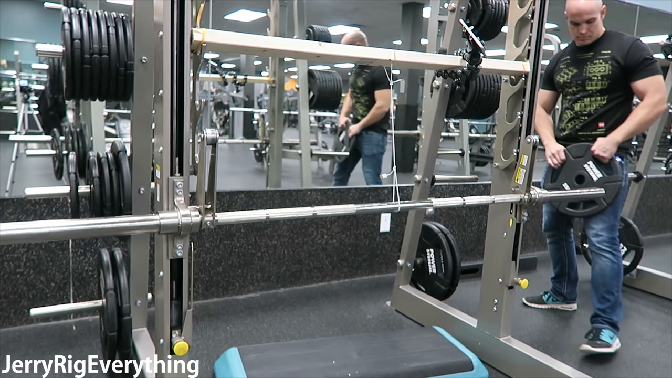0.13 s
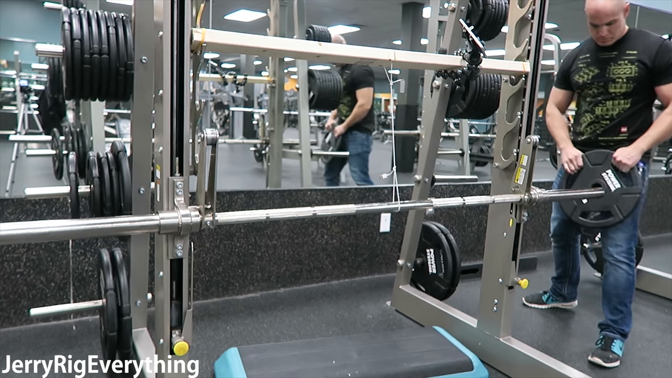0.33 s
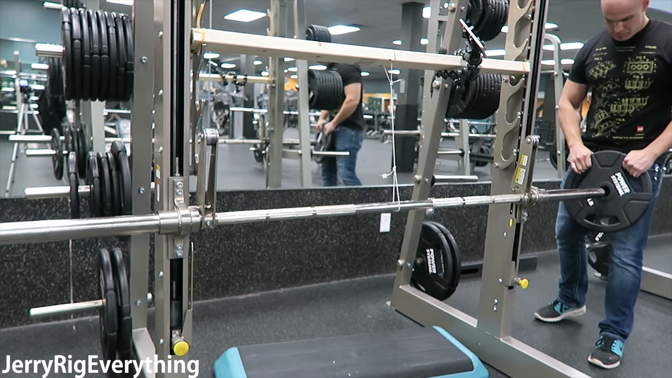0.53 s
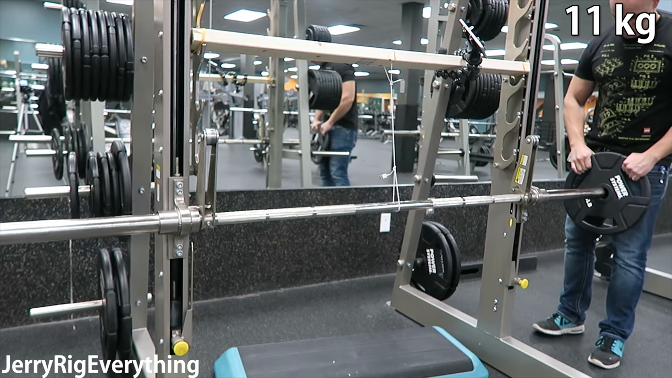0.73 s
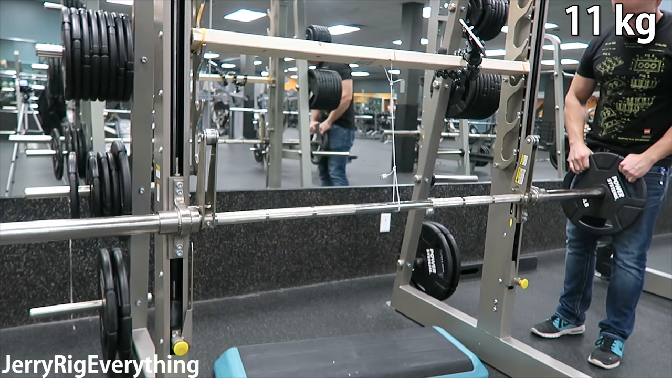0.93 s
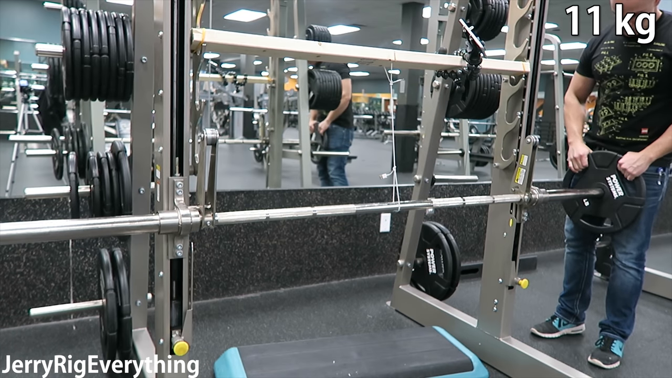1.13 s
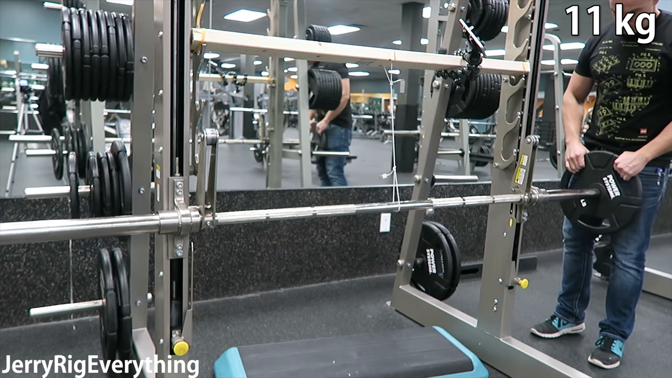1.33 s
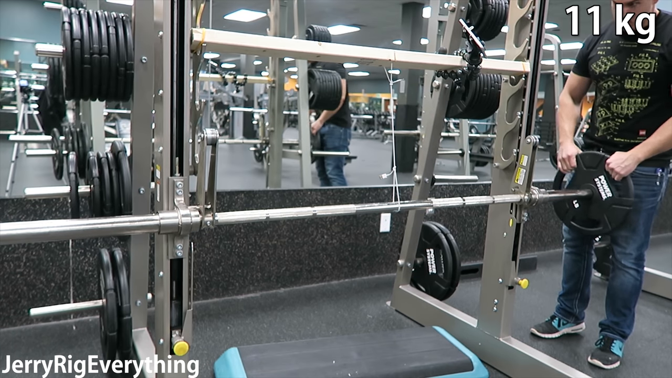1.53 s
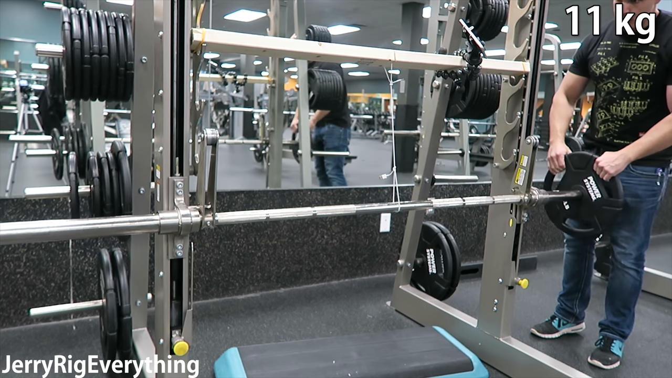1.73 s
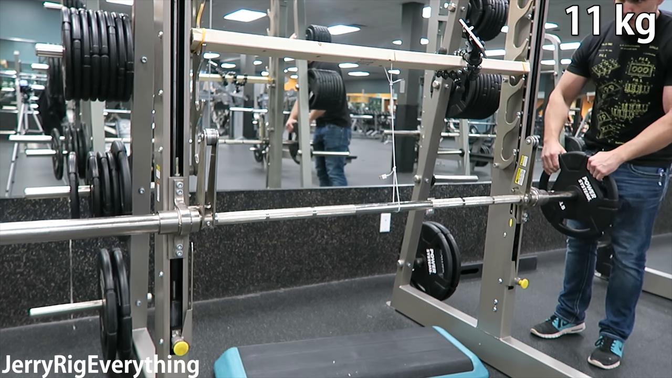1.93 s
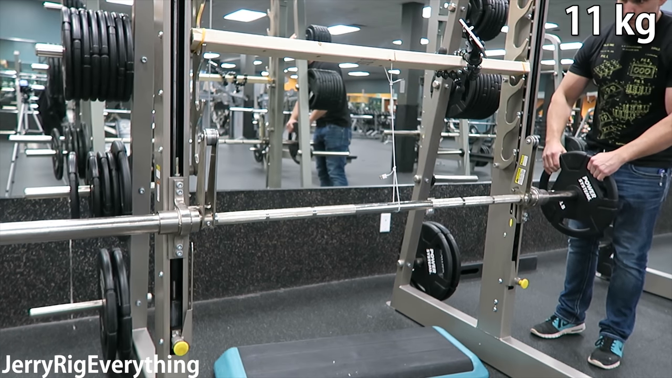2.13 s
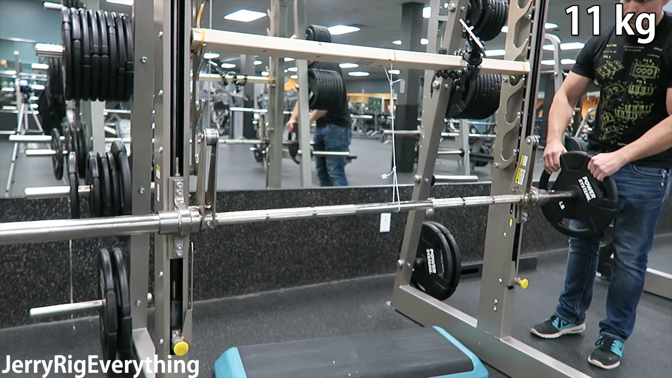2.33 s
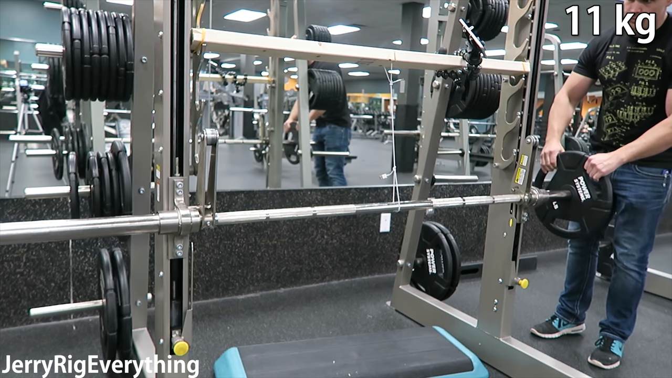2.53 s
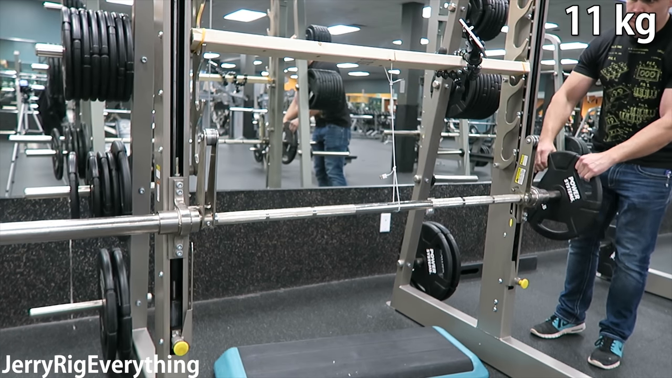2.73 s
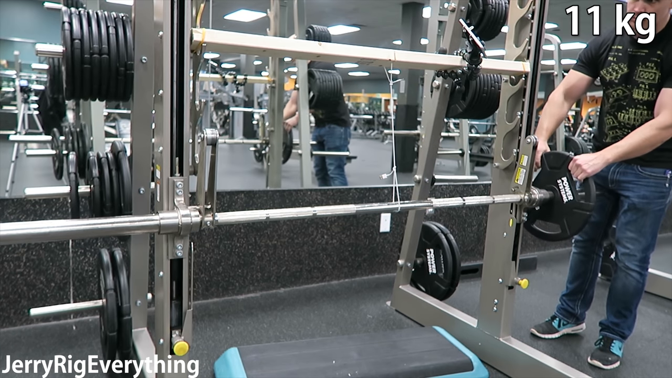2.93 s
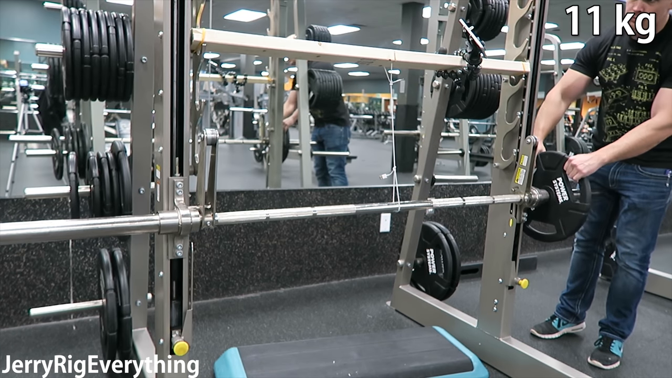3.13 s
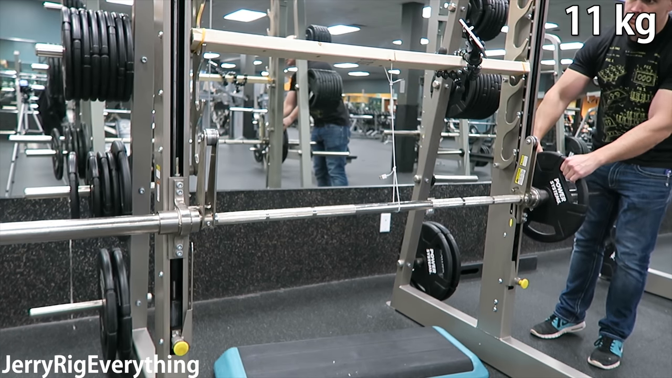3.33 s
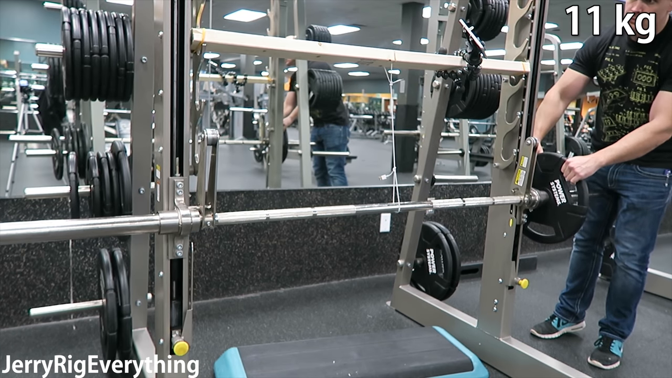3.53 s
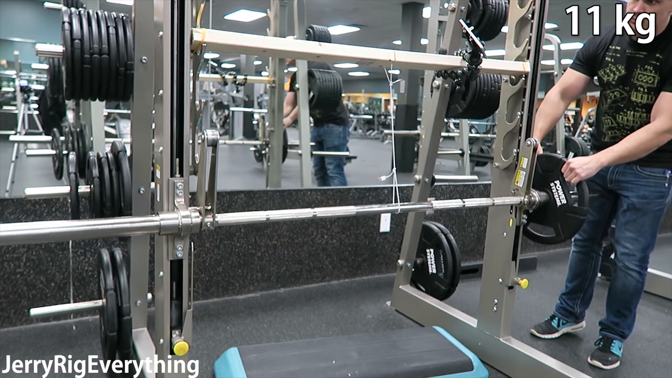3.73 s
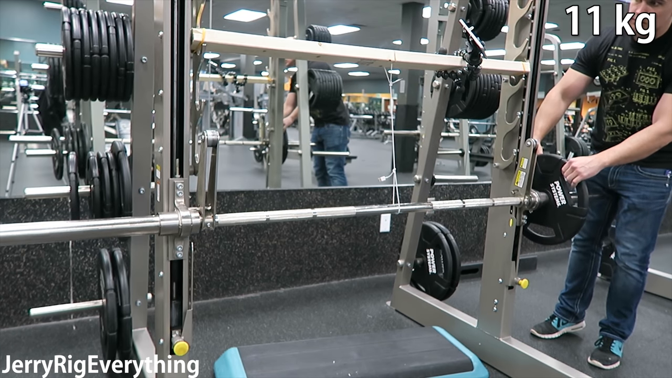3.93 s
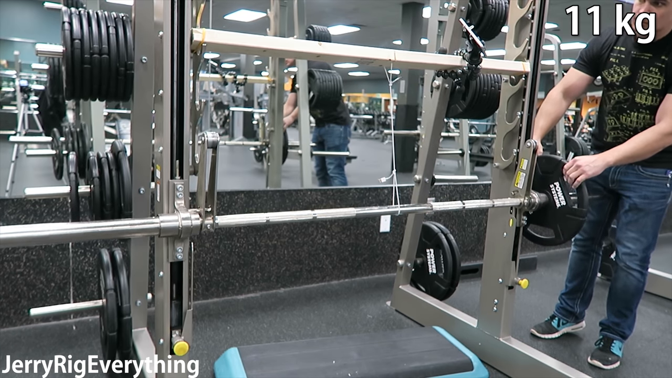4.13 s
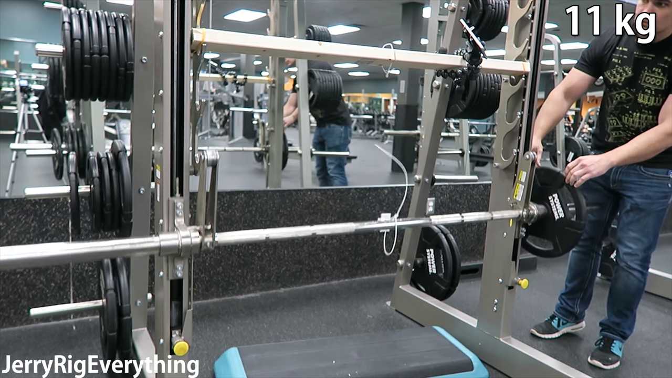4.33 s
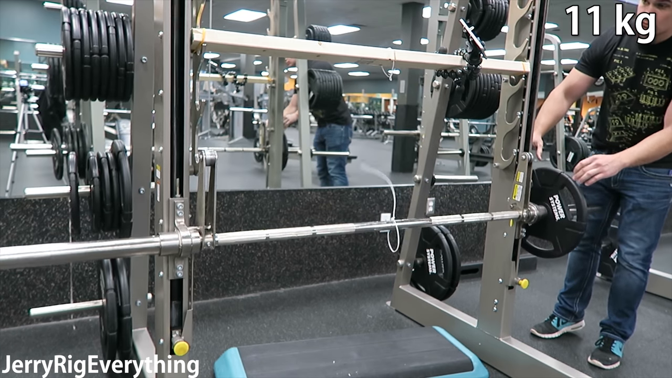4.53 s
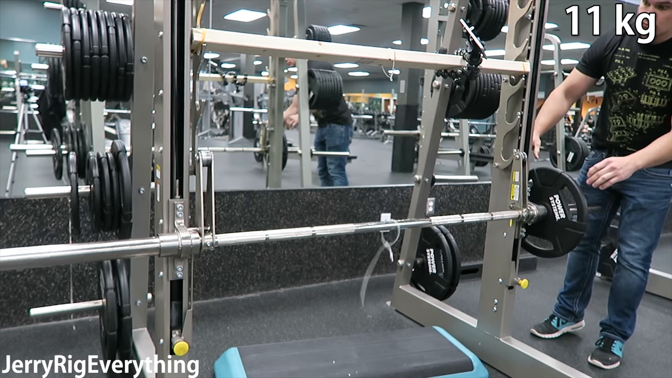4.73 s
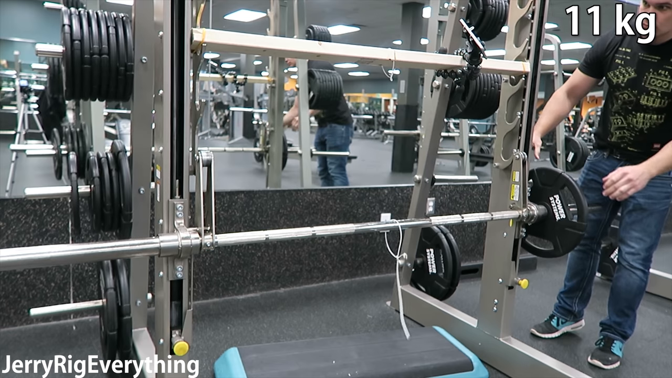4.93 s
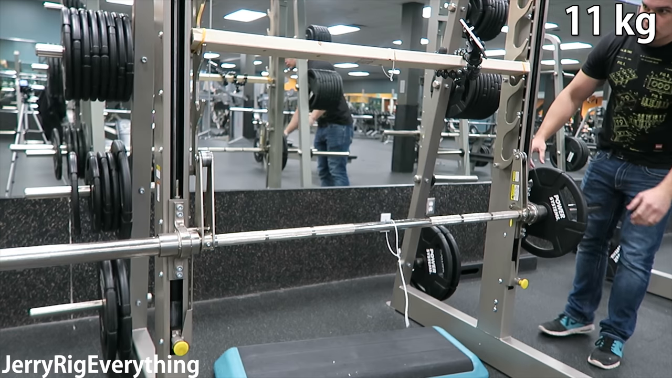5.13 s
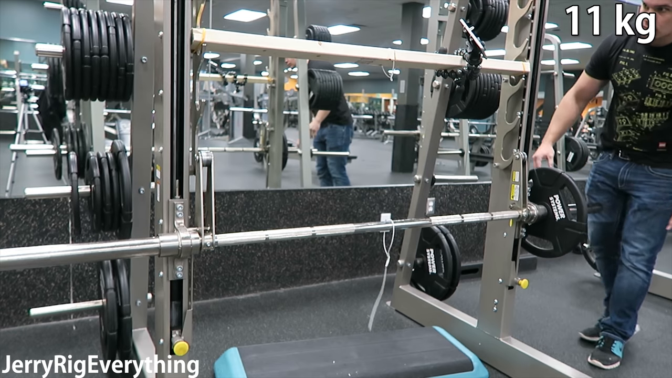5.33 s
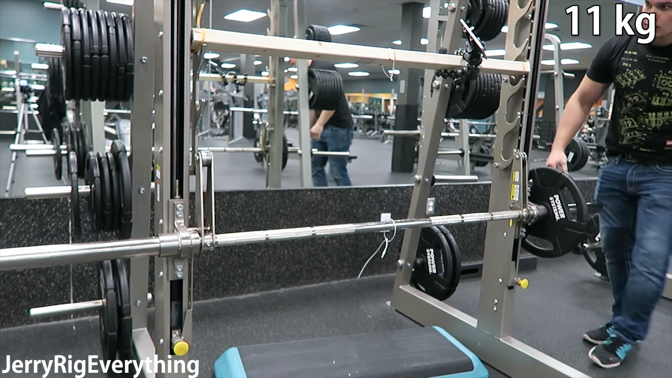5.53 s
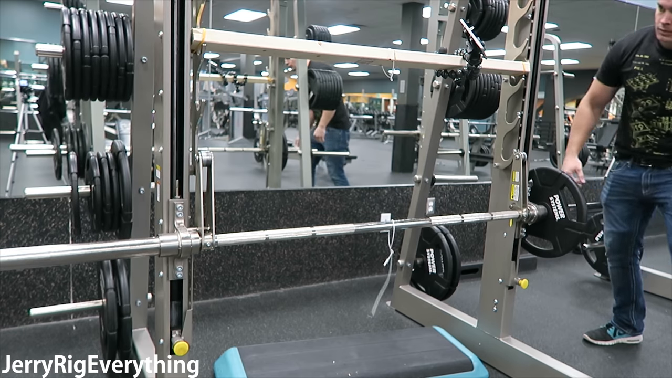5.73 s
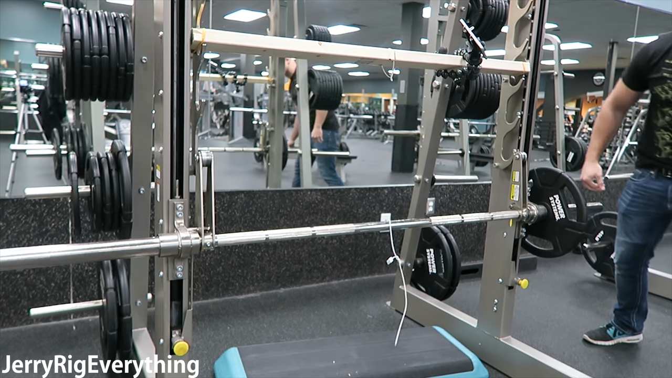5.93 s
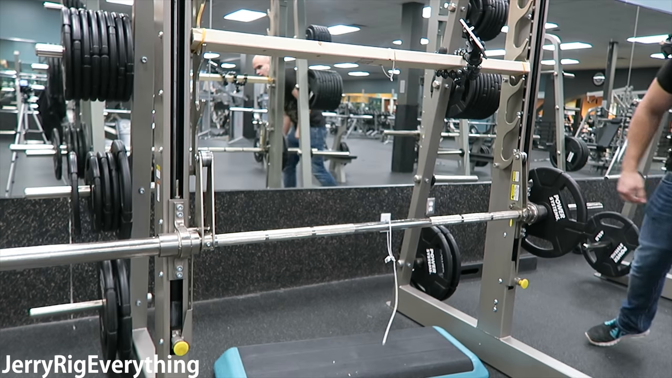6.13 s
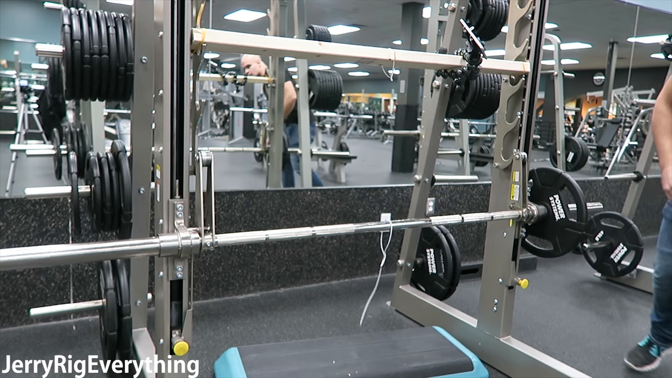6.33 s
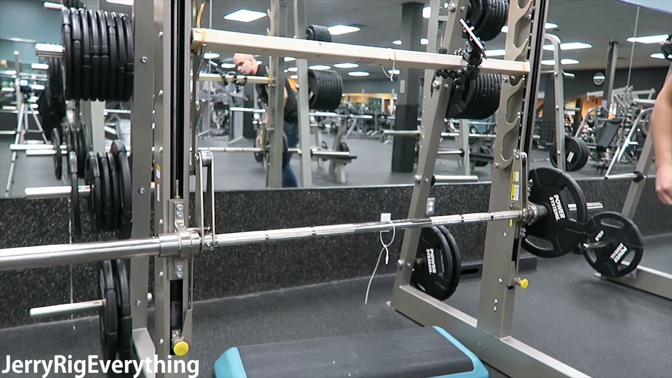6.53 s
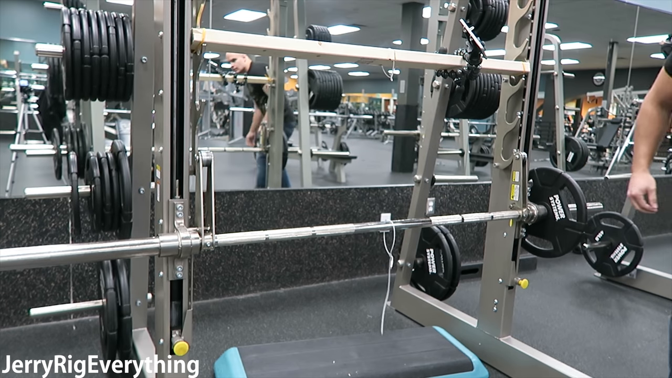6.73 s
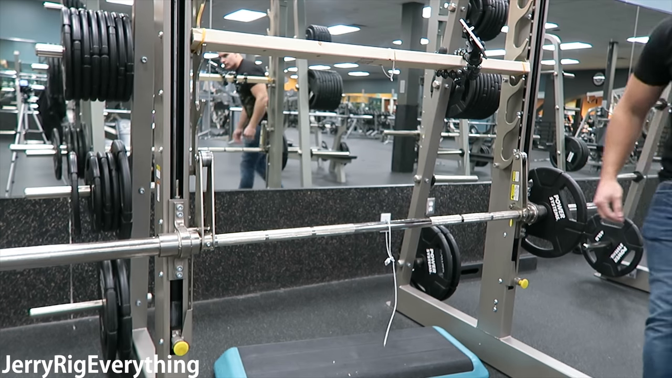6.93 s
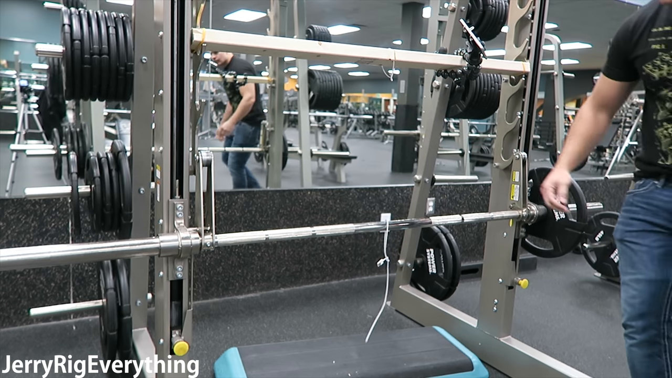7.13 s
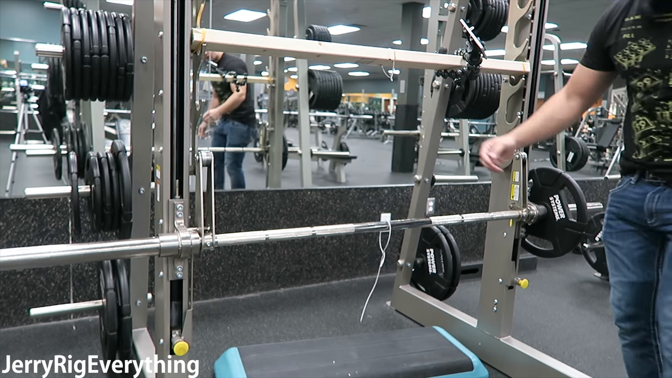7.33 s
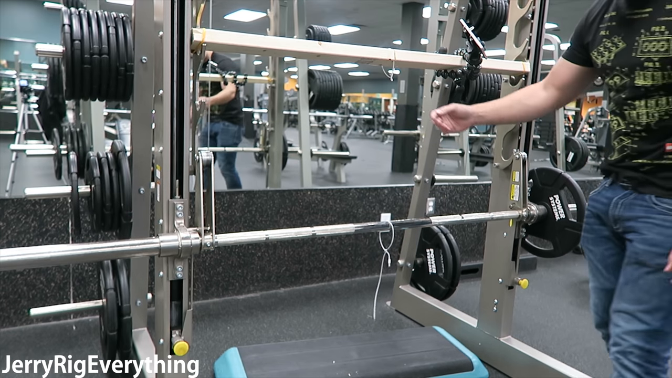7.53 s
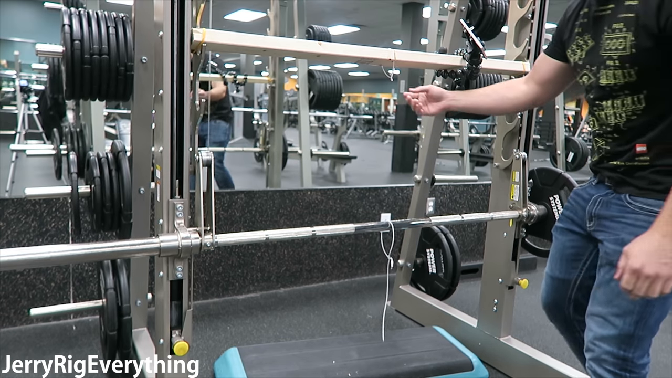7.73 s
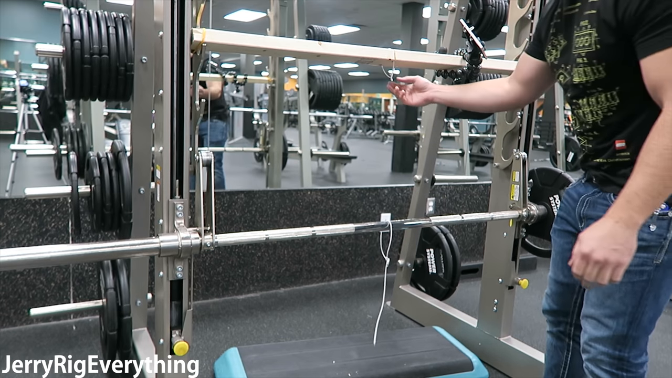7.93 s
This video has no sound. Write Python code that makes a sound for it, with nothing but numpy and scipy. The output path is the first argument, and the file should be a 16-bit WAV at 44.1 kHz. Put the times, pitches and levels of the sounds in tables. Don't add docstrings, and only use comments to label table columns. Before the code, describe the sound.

A microphone a few metres off catches a wide fan rumble and airy hiss in a big hall. Soft iron bumps and a few glancing clinks come first; midway, a fast cluster of loud, bright steel clanks with chattering grind and short squeals ends in a final clank. The background briefly drops, a thin bar tone lingers, then only faint rustles and distant taps remain.

```python
import sys
import numpy as np
from scipy import signal
from scipy.fft import rfft, irfft, next_fast_len
from scipy.io import wavfile
from scipy.ndimage import map_coordinates

SR = 44100
rng = np.random.default_rng(int(sys.argv[2]) if len(sys.argv) > 2 else 0)


def store_pcm(level_fs):
    pcm = np.round(np.clip(level_fs, -1, 1) * 32767).astype(np.int16)
    wavfile.write(sys.argv[1], SR, np.atleast_2d(pcm).T)


def ratio(d):
    e = np.asarray(d, float) / 20
    return 10 ** e


N = 355798

# (frequency [Hz], density [dB per Hz])
RUMBLE_SPECTRUM = [(13, -32), (22, -10), (38, -5.5), (54, -1), (70, 1), (101, -12), (118, -4.5), (131, 1),
                   (162, -7), (196, -2), (230, -8), (312, -10), (368, -13.5), (412, -25), (450, -18),
                   (580, -41), (990, -120)]
# (frequency [Hz], density [dB per Hz])
HISS_SPECTRUM = [(220, -29), (380, -3), (543, -7), (718, -5.5), (852, -9), (950, -7.5), (1010, -7.5),
                 (1380, -11), (2380, -15.5), (2770, -18), (3290, -18.5), (5850, -31.5), (11800, -43),
                 (14000, -51.5), (15600, -78)]
# (frequency [Hz], left-right likeness [-1 to 1])
AIR_ALIKE = [(60, .9995), (130, .99), (290, .86), (640, .6), (1410, .79), (3100, .72), (6820, -.07),
             (15000, -.5)]
# (time [s], depth [dB], attack [s], hold [s], release [s])
GAIN_DUCK = (4.5, -10, 0.22, 0.64, 1.18)

# (frequency [Hz], width [Hz], level [dB])
PLATE_MODES = [(205, 20, -7), (319.7, 7.7, -2), (502, 43.4, -1), (545, 24, 2), (571, 29, 2.5),
               (701, 47, -0.5), (789, 45, -4.5), (930, 26, 2.5), (976, 29, -2.5), (1050, 18, 5),
               (1180, 140, -5.5), (1267, 51, 2), (890, 1500, -7)]
RACK_MODES = [(1400, 94, 20.5), (1706, 26, 12), (1900, 840, -5.5), (2020, 59, 7), (2210, 83, -10),
              (2460, 75, -3), (2956, 100, -4), (3570, 67, -10), (1900, 2700, -2)]
TREBLE_MODES = [(3640, 140, 4), (4100, 750, 9), (4550, 970, 3.5), (6200, 140, -4), (7300, 200, -28),
                (8900, 330, -11.5), (10400, 4300, -10.5), (12670, 830, -18.5), (5000, 5900, -7)]
SLEEVE_MODES = [(2780, 59, -7.5), (2740, 69, -5.5), (2870, 37, -1), (2880, 30, -10.5), (3580, 29, 2),
                (3640, 45, -2), (4560, 81, 3.5), (4760, 63, -8), (5270, 70, -17), (5500, 35, -6),
                (6440, 22, -8), (7300, 25, -4), (8300, 34, -3), (10200, 60, -3)]
# (from [Hz], to [Hz])
BODY_REACH = [(160, 1450), (1350, 3600), (3300, 12000), (2000, 11000)]

# (time [s], rack peak [dB], centre [Hz], length [s])
SCUFFS_AT = [(0.127, -37.5, 1340, 0.043), (0.515, -39, 1520, 0.03), (0.85, -33.5, 2000, 0.063),
             (1.751, -37.5, 1410, 0.052), (2.012, -34.5, 1400, 0.055), (2.083, -37.5, 2820, 0.047),
             (3.481, -32, 3000, 0.015), (3.894, -42, 3000, 0.016), (5.498, -51, 2190, 0.026),
             (5.665, -42.5, 2020, 0.059), (7.415, -31, 2400, 0.042), (7.595, -39, 3000, 0.039),
             (7.813, -34.5, 1500, 0.038), (8.025, -30.5, 2400, 0.12)]
# (time [s], peak [dB], centre [Hz], length [s])
SWISHES_AT = [(.85, -53, 4800, 0.038), (3.36, -35.5, 7000, 0.046), (3.42, -49, 5500, 0.046),
              (3.485, -48, 4500, 0.028), (4.05, -38, 6200, 0.023), (4.25, -34, 4100, 0.017),
              (4.97, -46, 4760, 0.057), (5.49, -61, 5000, 0.027), (5.65, -68, 5430, 0.046),
              (7.575, -53, 4750, 0.045), (7.82, -56, 5000, 0.052)]
# (time [s], plate peak [dB], centre [Hz], contact length [s])
NUDGES_AT = [(1.104, -28.5, 487, 0.085), (1.173, -28.5, 314, 0.063), (1.264, -19, 660, 0.039),
             (1.335, -38, 304, 0.027), (1.539, -14, 830, 0.031), (1.553, -11.5, 1050, 0.013),
             (1.56, -14.5, 980, 0.022), (1.582, -17.5, 500, 0.055), (1.66, -33, 700, 0.2),
             (2.037, -26.5, 640, 0.026), (2.182, -24.5, 620, 0.046), (2.362, -28.5, 324, 0.053),
             (2.656, -29, 340, 0.13), (2.799, -30, 490, 0.014), (2.82, -20, 450, 0.058),
             (2.863, -28, 543, 0.11), (2.915, -38, 571, 0.054), (2.948, -20, 440, 0.039),
             (3.073, -34.5, 462, 0.017), (3.626, -44, 307, .03)]
# (time [s], plate peak [dB], centre [Hz], contact length [s])
KNOCKS_AT = [(3.372, -15, 433, 0.011), (3.461, -28, 310, 0.028), (4.386, -9.5, 557, 0.017),
             (4.475, -5, 530, 0.021), (4.495, -18, 515, 0.041), (4.595, -7.5, 706, 0.014),
             (4.639, -23, 674, 0.0076), (4.853, -7, 540, 0.028), (4.969, -15.5, 706, .035),
             (5.48, -39, 596, 0.027), (5.994, -37.5, 377, 0.026), (6.11, -37, 350, 0.03)]
# (time [s], peak [dB], centre [Hz], contact length [s])
THUDS_AT = [(1.29, -23.5, 250, 0.08), (1.555, -19.5, 235, 0.049), (2.808, -31, 1130, 0.062),
            (2.85, -28.5, 1180, 0.036), (3.37, -18.5, 235, 0.094), (3.385, -23.5, 990, 0.068),
            (4.04, -31, 513, 0.023), (4.235, -19.5, 591, 0.055), (4.49, -19.5, 1000, 0.028),
            (4.535, -13, 943, 0.045), (4.58, -29.5, 215, 0.044), (4.62, -17.5, 1120, 0.027),
            (8.03, -31, 205, 0.025)]
# (time [s], rack peak [dB], centre [Hz], plate under rack [dB], contact length [s])
GLANCES_AT = [
    (1.273, -22.5, 2860, 4.5, 0.034),
    (1.536, -14, 2370, -9, 0.025),
    (1.547, -14, 1980, -12, 0.022),
    (3.353, -18, 2900, 7, 0.02),
    (3.374, -23.5, 1550, 2, 0.034),
]
# (time [s], rack peak [dB], centre [Hz], treble [dB], contact length [s])
CLACKS_AT = [(4.031, -18, 2080, -6.5, .0097), (4.038, -20, 2090, -9, .012), (4.22, -4, 2310, -27, .0037),
             (4.227, -11, 1510, -6.5, .016), (4.325, -19.5, 2210, -16, .0063),
             (4.332, -21, 2600, -6.5, .01), (4.351, -16, 2230, -5.5, .036), (4.371, -10, 1900, -25.5, .012),
             (4.38, -17.5, 2310, -15, .0051), (4.47, -15, 2370, -15.5, .0064),
             (4.509, -26, 1400, -17, .014), (4.579, -2.5, 2800, -21, .011),
             (4.583, -1.5, 1740, -11.5, .011), (4.602, -22.5, 1865, -15.5, .019),
             (4.707, -20.5, 3000, -7, .02), (4.774, -22, 2150, -22, .012), (4.823, -14.5, 3000, -8.5, .03),
             (4.852, -8.5, 2780, -9.5, 0.017), (4.861, -17.5, 2306, -6, .011),
             (4.892, -18.5, 2270, -17, .02)]
# (time [s], plate over rack [dB])
SEATED_LEVEL = [
    (4.04, -31),
    (4.22, -11.5),
    (4.38, -1),
    (4.6, -5.5),
    (4.75, 4.5),
    (4.82, -20),
    (4.86, -1),
]
# (time [s], peak [dB], centre [Hz], contact length [s])
CHIMES_AT = [(1.284, -39, 2900, 0.033), (1.286, -56, 4560, 0.012), (1.338, -47, 2940, 0.054),
             (1.56, -46, 2900, 0.024), (1.56, -56, 8300, 0.016), (1.795, -51, 2880, 0.029),
             (2.08, -48.5, 2900, 0.02), (3.358, -28.5, 2880, 0.017), (3.36, -35, 3700, 0.016),
             (3.358, -46, 4600, 0.014), (4.51, -32, 3700, 0.033), (4.545, -34.5, 4550, 0.033),
             (4.555, -39, 5540, 0.026), (4.65, -36.5, 4550, .02), (4.68, -33, 3660, 0.073),
             (4.745, -31, 2870, 0.12), (4.76, -52, 7300, 0.045), (4.851, -16.5, 2760, 0.023),
             (4.92, -38, 2750, 0.1), (5.02, -50, 2870, 0.042)]
# (time [s], frequency [Hz], level [dB], t60 [s])
TONES_AT = [(1.284, 2930, -36, 0.2), (1.287, 4560, -40.5, 0.13), (1.287, 6370, -47, 0.11),
            (1.287, 8200, -51, 0.12), (1.341, 2900, -47, 0.19), (1.54, 2420, -25, 0.079),
            (1.539, 2740, -27, .1), (1.543, 3130, -31.5, .15), (1.546, 1894, -27, 0.14),
            (1.56, 973, -19, 0.12), (1.575, 523.4, -33.5, 0.51), (1.6, 987, -36, 0.76),
            (1.56, 8700, -54, 0.14), (2.036, 658, -50, 0.11), (4.032, 1737, -22, 0.063),
            (4.033, 2225, -18.5, 0.06), (4.035, 3880, -26.5, 0.07), (4.04, 6210, -33, 0.099),
            (4.226, 1530, -27, .15), (4.49, 530, -22, 0.22), (4.852, 2778, -14, 0.078),
            (4.853, 546, -28, 0.12), (4.878, 2224, -26.5, .2), (4.899, 2762, -31, 0.2),
            (4.972, 2790, -32.5, 0.13), (4.99, 602, -30.5, 0.18), (4.9, 447, -33.5, 0.28),
            (5.0, 956, -37, 0.61), (7.415, 2700, -49, 0.13), (7.414, 1260, -42, 0.12),
            (7.428, 1900, -55, 0.092), (5.0, 2600, -50.5, 0.75), (4.855, 5800, -38, .3),
            (4.975, 5300, -47, .25), (2.81, 980, -36, 0.23), (2.82, 1190, -37.5, 0.16),
            (4.78, 1200, -27.5, .1), (1.551, 1270, -25, 0.086), (1.596, 1260, -36, .2),
            (4.584, 1200, -15.5, .05), (4.64, 1300, -30, .1), (3.375, 500, -30, .12),
            (3.41, 1000, -36, 0.17)]
# (time [s], frequency [Hz], level [dB], hold [s])
SQUEALS_AT = [(4.478, 4820, -41, 0.0075), (4.507, 4330, -32, 0.0094), (4.53, 3580, -30, 0.044),
              (4.537, 7300, -39, 0.057), (4.527, 9400, -26, .005), (4.555, 10700, -39, .025),
              (4.67, 11150, -40, .012), (4.722, 7200, -45, 0.031), (4.543, 4550, -26.5, 0.024),
              (4.553, 5240, -40, 0.017), (4.59, 5390, -32, .012), (4.65, 4550, -38, 0.018),
              (4.68, 3654, -36.5, 0.036), (4.706, 4500, -33, 0.025), (4.745, 2870, -34.5, 0.094),
              (4.761, 7100, -44, 0.02), (4.78, 2130, -27.5, 0.01), (4.784, 4550, -37, 0.011),
              (4.82, 4130, -26, 0.0069), (4.83, 3530, -29, 0.0074), (4.478, 545, -24.5, .012),
              (4.497, 525, -20, 0.016), (4.554, 602, -24, .015), (4.585, 660, -16, 0.0039),
              (4.598, 678, -13.5, .005), (4.615, 600, -21, .005)]
# (time [s], rack peak [dB], centre [Hz], plate over rack [dB], length [s])
RUBS_AT = [
    (2.38, -34, 1400, 6, .025),
    (2.19, -41, 1450, -3, .03),
    (2.4, -41, 1400, 5, 0.12),
    (3.365, -27, 1400, 5, .05),
    (3.9, -35, 1700, -1, .04),
    (1.6, -32, 1500, -5, 0.034),
]
# (time [s], level [dB], frequency [Hz], t60 [s])
LOW_SWAY = (2.5, -45, 27, 1)
# (time [s], peak [dB], frequency [Hz])
SNAPS_AT = [(4.0315, -22, 2200), (4.2199, 0, 2140), (4.2245, -7, 1920), (4.325, -22, 2200),
            (4.3505, -16, 2220), (4.3709, -4.5, 2210), (4.3755, -8, 2300), (4.4722, -14, 2370),
            (4.779, -23, 2130), (4.8224, -17, 3320), (4.851, -7, 2780), (4.9714, -26, 2740)]
# (time [s], peak [dB], centre [Hz], contact length [s])
TICKS_AT = [(4.04, -24.5, 8900, 0.0021), (4.047, -36, 8900, .003), (4.058, -37, 6980, .003),
            (4.066, -37, 7030, .004), (4.228, -29.5, 8900, 0.0024), (4.236, -37, 8900, 0.0035),
            (4.246, -33.5, 6200, .003), (4.332, -34.5, 8900, 0.0023), (4.339, -43.5, 8900, 0.0026),
            (4.359, -35, 8900, 0.0033), (4.379, -28.5, 6200, 0.0027), (4.384, -32.5, 6200, .003),
            (4.52, -28, 10400, 0.0054), (4.55, -31.5, 10400, .02), (4.605, -26, 11000, .005),
            (4.68, -36, 10400, .01), (4.87, -24, 7000, 0.012), (4.48, -33, 6980, .008),
            (4.59, -22.5, 10400, 0.01), (4.715, -28, 6200, .006)]
# (time [s], load [dB], speed [dB])
PUSH = [
    (4.428, -28, -37.5),
    (4.48, -20.5, -31.5),
    (4.52, -20, -27.5),
    (4.57, -23.5, -22),
    (4.7, -25.5, -30),
    (4.78, -32, -31),
    (4.84, -30, -32),
    (4.87, -23, -28),
    (5.0, -37.5, -43),
]
# (time [s], frequency [Hz], level [dB], t60 [s], a hand damps it [s], t60 after that [s])
BAR_MODE = (5.0, 786.5, -45, 3, 5.9, .35)

# (delay [s], level [dB])
WALL_ECHOES = [(.006, -19.5), (.011, -13), (.017, -37), (.026, -18.5), (.035, -42)]
# (frequency [Hz], t60 [s])
HALL_DECAY = [(200, 0.97), (1000, 0.61), (4000, 0.45), (12000, 0.19)]
# (frequency [Hz], left-right likeness [-1 to 1])
HALL_WIDTH = [(300, 0.86), (3300, 0.99), (5500, 0.38), (12000, .3)]
# (frequency [Hz], level [dB])
DULLING_CURVE = [(9000, 0), (12000, 0), (13000, -6), (14000, 1), (15500, -14.5)]

PLATE, RACK, TREBLE, SLEEVE = range(4)
AIR_DB = -39
HISS_DUCKS = 0.9
HANDS_DAMP = 1.85
NUDGE_RACK_DB = -22
KNOCK_RACK_DB, KNOCK_TREBLE_DB = -9.5, -20
SCUFF_PLATE_DB, SCUFF_TREBLE_DB = -3, -9.5
GLANCE_TREBLE_DB = -10.5
TONE_ATTACK_S, TONE_SPLIT = 0.0022, 0.0308
SQUEAL_ATTACK_S, SQUEAL_T60_S, SQUEAL_SPLIT = 0.016, 0.054, 0.0054
SNAP_T60_S = 0.0035
TREBLE_GROWS, TREBLE_DB = 1.5, -37.5
SETTLE_DB_PER_S, SETTLE_S = 95.5, 0.24
PING_DB, PING_T60_S = -2, 0.06
PING_LOW_HZ, PING_HIGH_HZ = 3200, 11000
LAG_S = 1.6e-5
HALL_DB = -9.5
SINGING_HALL_DB = -5
TOP_HZ = 15700


def unit(x):
    return x / np.sqrt(np.mean(x ** 2) + 1e-20)


def along(points, hz):
    f, v = np.transpose(points)
    return np.interp(np.log(hz + 1), np.log(f + 1), v)


def curves(rows):
    s, *columns = np.transpose(rows)
    return [np.interp(np.arange(N) / SR, s, column) for column in columns]


def wobble(rate):
    knots = rng.standard_normal(int(N * rate / SR) + 4)
    return map_coordinates(knots, [np.arange(N) * rate / SR])


def filtered(x, response):
    m = next_fast_len(x.shape[-1] + SR // 10)
    spectrum = rfft(x, m) * response(np.fft.rfftfreq(m, 1 / SR))
    return irfft(spectrum, m)[..., :x.shape[-1]]


def add_at(out, s, sound):
    out[round(s * SR):][:len(sound)] += sound


def spread(pair, alike, spectrum):
    def mid_side(hz):
        turn = np.arccos(np.clip(along(alike, hz), -1, 1)) / 2
        return ratio(along(spectrum, hz)) * [np.cos(turn), np.sin(turn)]

    mid, side = filtered(pair, mid_side)
    return unit(np.array([mid + side, mid - side]))


def body(part, scatter_db, centre_hz=None, damp=1):
    modes = [PLATE_MODES, RACK_MODES, TREBLE_MODES, SLEEVE_MODES][part]
    c, width, db = np.transpose(modes)[:, :, None]
    if centre_hz:
        octaves = [0.47, 0.22, 0.65, 0.16][part]
        deepest_db = [25.9, 27, 27.1, 45][part]
        off_centre_db = np.minimum(6 * (np.log2(c / centre_hz) / octaves) ** 2, deepest_db)
        db = db - np.where(width < 1600, off_centre_db, 5)
    signs = (-1) ** np.arange(len(c))[:, None]
    gain = ratio(db + scatter_db * rng.standard_normal(c.shape)) * signs
    width = width * np.where(width < 100, damp, 1)
    lo_hz, hi_hz = BODY_REACH[part]

    def edge(u):
        return 1 / (1 + 1.4j * u - u * u) ** 3

    def response(f):
        reach = edge(f / hi_hz) * edge(f / lo_hz) * (f / lo_hz) ** 6
        return reach * np.sum(gain * 1j * f * width / (c * c - f * f + 1j * f * width), axis=0)

    return response


def contacts(rows, parts, rise, gain_db, snap=0, lead_s=0, damp=1):
    out, t = np.zeros(N + SR), np.arange(SR // 4) / SR
    for s, db, hz, *others, length in rows:
        length = max(length, 0.002)
        force = rng.standard_normal(len(t)) * (1 - np.exp(-t / (rise * length))) * ratio(-20 * t / length)
        chatter = np.repeat(rng.standard_normal(len(t) // 105), 105)
        force = force * ratio(0.9 * chatter)
        for part, part_db in zip(parts, [0] + others):
            strike = force + snap * (part != PLATE) * (t == 0)
            centre_hz = hz if part == parts[0] else None
            ring = filtered(strike, body(part, scatter_db=2.05, centre_hz=centre_hz, damp=damp))
            size = np.sqrt(np.mean(ring[:SR // 25] ** 2))
            add_at(out, s - lead_s, ratio(db + part_db + gain_db) * ring / size)
    return out[:N]


def air():
    s, depth_db, attack, hold, release = GAIN_DUCK
    down, up = s + attack, s + attack + hold
    dip_db, = curves([(s, 0), (down, depth_db), (up, depth_db), (up + release, 0)])
    drift = wobble(2.55)
    rumble_db = AIR_DB + dip_db + 3 + 0.31 * drift + 0.8 * wobble(9)
    hiss_db = AIR_DB + HISS_DUCKS * dip_db - 7.5 + 0.3 * drift + 0.56 * wobble(12)
    rumble = ratio(rumble_db) * spread(rng.standard_normal((2, N)), AIR_ALIKE, RUMBLE_SPECTRUM)
    hiss = ratio(hiss_db) * spread(rng.standard_normal((2, N)), AIR_ALIKE, HISS_SPECTRUM)
    return rumble + hiss


def brushes():
    scuffs = [(s, db, hz, SCUFF_PLATE_DB, SCUFF_TREBLE_DB, length) for s, db, hz, length in SCUFFS_AT]
    out = contacts(scuffs, (RACK, PLATE, TREBLE), rise=0.18, gain_db=-18.0)
    return out + contacts(SWISHES_AT, (TREBLE,), rise=0.38, gain_db=-8.0)


def soft_blows():
    nudges = [(s, db, hz, NUDGE_RACK_DB, length) for s, db, hz, length in NUDGES_AT]
    knocks = [(s, db, hz, KNOCK_RACK_DB, KNOCK_TREBLE_DB, length) for s, db, hz, length in KNOCKS_AT]
    out = contacts(nudges, (PLATE, RACK), rise=0.23, gain_db=-12.5, lead_s=0.004906, damp=HANDS_DAMP)
    out = out + contacts(knocks, (PLATE, RACK, TREBLE), rise=0.41, gain_db=-14.0, lead_s=0.005)
    return out + contacts(THUDS_AT, (PLATE,), rise=0.1, gain_db=-10.5, damp=1.4)


def hard_blows():
    glances = [(s, db, hz, plate_db, plate_db + GLANCE_TREBLE_DB, length)
               for s, db, hz, plate_db, length in GLANCES_AT]
    clacks = [(s, db, hz, np.interp(s, *np.transpose(SEATED_LEVEL)), treble_db, length)
              for s, db, hz, treble_db, length in CLACKS_AT]
    out = contacts(glances, (RACK, PLATE, TREBLE), rise=0.45, gain_db=-19)
    out = out + contacts(clacks, (RACK, PLATE, TREBLE), rise=0.31, gain_db=-15.5, snap=2.8)
    return out + contacts(CHIMES_AT, (SLEEVE,), rise=0.15, gain_db=-6.0, damp=2.6)


def singing():
    out, t = np.zeros(N + SR), np.arange(SR // 2) / SR
    rows = [(s, hz, db, 0, t60, TONE_ATTACK_S, TONE_SPLIT) for s, hz, db, t60 in TONES_AT]
    rows = rows + [(s, hz, db, hold, SQUEAL_T60_S, SQUEAL_ATTACK_S, SQUEAL_SPLIT)
                   for s, hz, db, hold in SQUEALS_AT]
    for s, hz, db, hold, t60, attack, split in rows:
        near_hz = hz * (1 + split * np.append(0, rng.uniform(-0.986, 1, size=3)))[:, None]
        cluster = np.sum(np.sin(2 * np.pi * near_hz * t) * [[1], [0.5], [0.5], [0.5]], axis=0)
        fade = ratio(db - 60 * np.maximum(t - hold, 0) / t60)
        add_at(out, s, fade * (1 - np.exp(-t / attack)) * cluster)
    return out[:N]


def rubs():
    return contacts(RUBS_AT, (RACK, PLATE), rise=0.3, gain_db=-17.5, damp=1.8)


def shudder():
    s, db, hz, t60 = LOW_SWAY
    t = np.maximum(np.arange(N) / SR - s, 0)
    return ratio(db - 60 * t / t60) * (1 - np.exp(-t / 0.04)) * np.sin(2 * np.pi * hz * t)


def snaps():
    out, t = np.zeros(N + SR), np.arange(SR // 50) / SR
    for s, db, hz in SNAPS_AT:
        add_at(out, s, ratio(db - 60 * t / SNAP_T60_S) * np.sin(2 * np.pi * hz * t))
    return out[:N]


def collar_ticks():
    return contacts(TICKS_AT, (TREBLE,), rise=0.22, gain_db=-14.0)


def slide():
    start, end = PUSH[0][0], PUSH[-1][0]
    now = slice(round(start * SR), round((end + SETTLE_S) * SR))
    density = 500 / SR * ratio(3 * wobble(40))
    hits = (rng.random(N) < density) * ratio(np.minimum(3 * rng.exponential(size=N), 6))
    rattle = signal.fftconvolve(hits, ratio(-20 * np.arange(SR // 100) / SR / 0.005))[:N]
    force = (rng.standard_normal(N) * (unit(rattle) + 0.23))[now]

    plate = unit(filtered(force, body(PLATE, scatter_db=3.0)))
    rack = unit(filtered(force, body(RACK, scatter_db=3.0, centre_hz=2690)))
    sleeve = unit(filtered(force, body(SLEEVE, scatter_db=8.5, damp=2.0)))
    treble = unit(filtered(force, body(TREBLE, scatter_db=1.5, centre_hz=3990)))

    load_db, speed_db = [c[now] for c in curves(PUSH)]
    t = np.arange(N)[now] / SR
    settle_db = -SETTLE_DB_PER_S * np.maximum(t - end, 0)
    speed_db = speed_db + settle_db
    treble_db = TREBLE_DB + TREBLE_GROWS * (speed_db + 31) - 4
    steel = ratio(speed_db - 6) * rack + ratio(treble_db) * (treble + 0.33 * sleeve)
    touching = np.clip(np.minimum(t - start, end + SETTLE_S - t) / 0.018, 0, 1)
    out = np.zeros(N)
    out[now] = touching * (ratio(load_db + settle_db - 3.5) * plate + steel)
    return out


def pings(count=110):
    out, t = np.zeros(N + SR), np.arange(SR // 10) / SR
    when, _, speed_db = np.transpose(PUSH)
    for place, pitch, softness in rng.random((count, 3)):
        s = when[1] + place * (when[-1] - when[1])
        hz = PING_LOW_HZ * (PING_HIGH_HZ / PING_LOW_HZ) ** pitch
        db = np.interp(s, when, speed_db) + PING_DB - 8 * softness - 16 * pitch
        fade = ratio(db - 60 * t / PING_T60_S) * (1 - np.exp(-t / 0.004))
        add_at(out, s, fade * np.sin(2 * np.pi * hz * t))
    return out[:N]


def bar_ring():
    s, hz, db, t60, rest, rest_t60 = BAR_MODE
    t = np.maximum(np.arange(N) / SR - s, 0)
    fade_db = db - 60 * t / t60 - 60 * np.maximum(t + s - rest, 0) / rest_t60 + 1.4 * wobble(42)
    tone = np.sin(2 * np.pi * hz * t + 0.52 * wobble(11))
    return np.sqrt(2) * ratio(fade_db) * (1 - np.exp(-t / 0.01)) * tone


def walls(x):
    out = np.zeros((2, N))
    for k, (s, db) in enumerate(WALL_ECHOES):
        for ear in (0, 1):
            lag = round(s * SR) + (3 if (k + ear) % 2 else 0)
            out[ear, lag:] += ratio(db) * x[:N - lag]
    return out


def hall(x):
    out, step = np.zeros((2, N + 2 * SR)), SR // 3
    tilt = [(20, 0.015), (20000, 0.004)]
    for k in range(0, N, step):
        noise = spread(rng.standard_normal((2, SR // 2)), HALL_WIDTH, tilt)
        hz, t, z = signal.stft(noise, SR, nperseg=256)
        decay = ratio(-60 * t / along(HALL_DECAY, hz)[:, None])
        tail = signal.istft(z * decay, SR, nperseg=256)[1]
        wet = signal.fftconvolve(x[None, k:k + step], tail / np.linalg.norm(tail[0]), axes=1)
        out[:, k + 400:k + 400 + wet.shape[1]] += wet
    return out[:, :N]


def scene():
    background = air()
    iron = brushes() + soft_blows() + hard_blows() + rubs() + snaps() + collar_ticks() + slide()
    iron = filtered(iron, lambda hz: ratio(along(DULLING_CURVE, hz)))
    modes = singing() + pings()
    near = iron + modes
    ears = np.array([[1], [-1]])
    direct = filtered(np.array([near, near]), lambda hz: np.exp(-1j * np.pi * hz * LAG_S * ears))
    room = walls(near) + ratio(HALL_DB) * hall(iron + ratio(SINGING_HALL_DB) * modes)
    return direct + room + shudder() + bar_ring() + background


def roll_off(x):
    return signal.sosfilt(signal.butter(12, 15700, fs=SR, output="sos"), x)


def record(dry):
    held = dry / (1 + np.abs(dry / 3.0) ** 6) ** (1 / 6)
    mix = filtered(held, lambda hz: hz < TOP_HZ)
    return roll_off(mix)


dry = scene()
out = record(dry)
store_pcm(out)
```